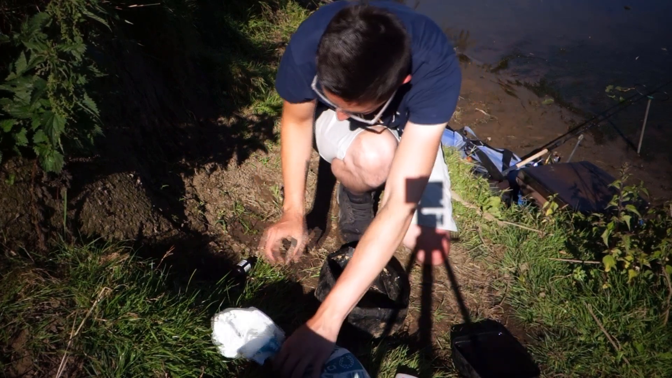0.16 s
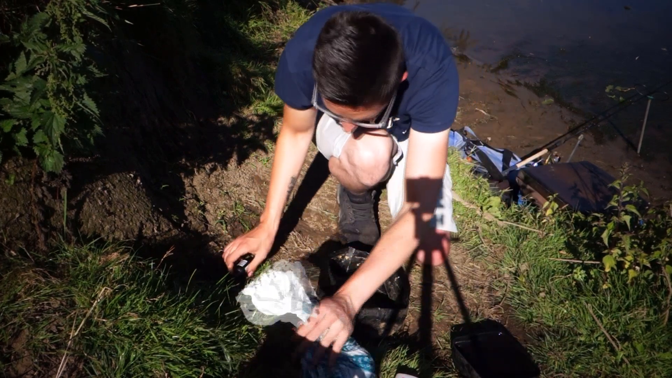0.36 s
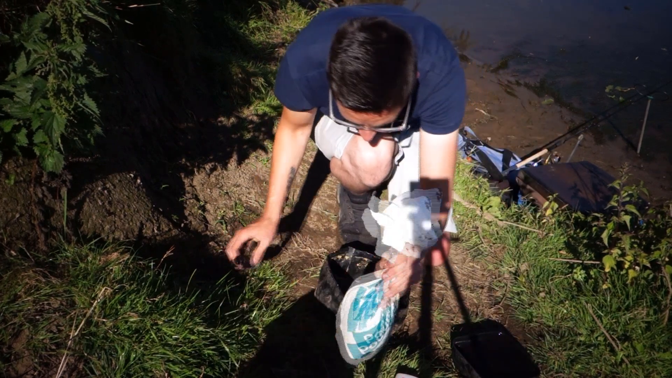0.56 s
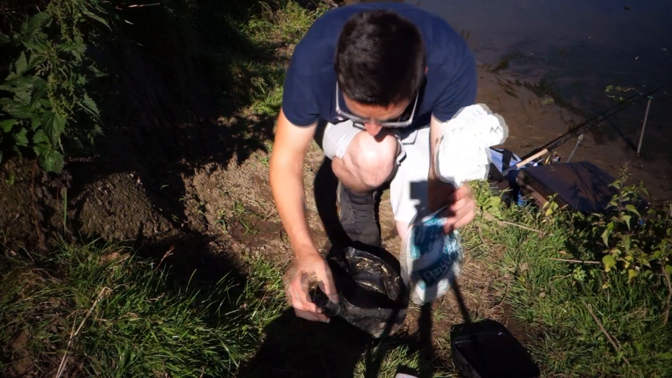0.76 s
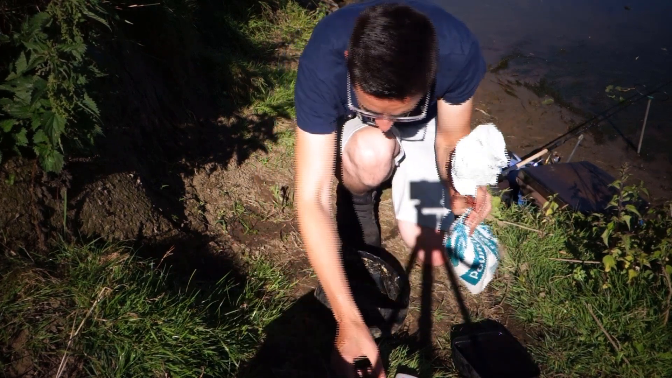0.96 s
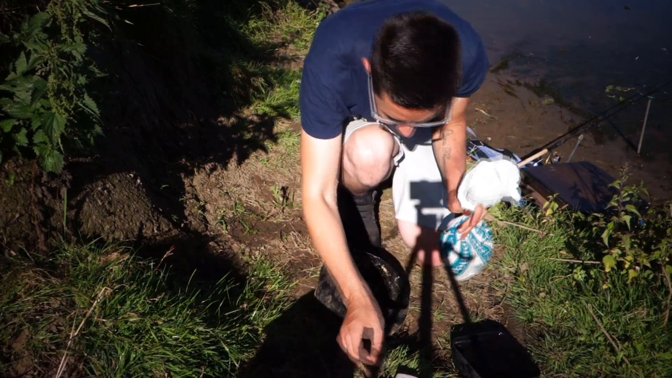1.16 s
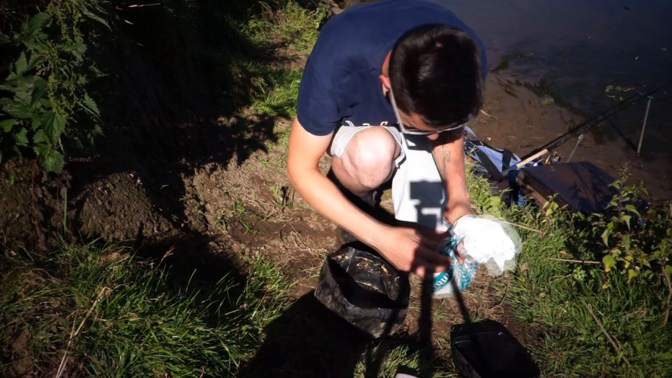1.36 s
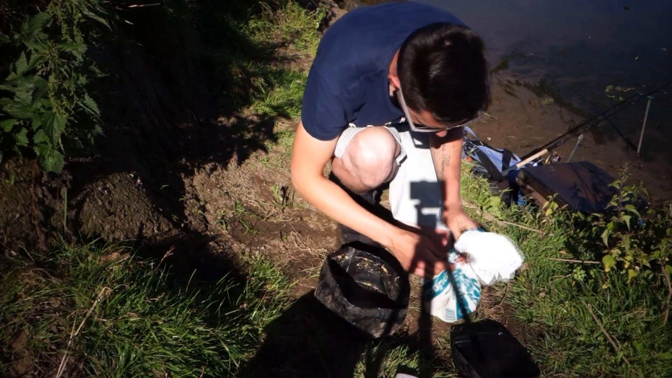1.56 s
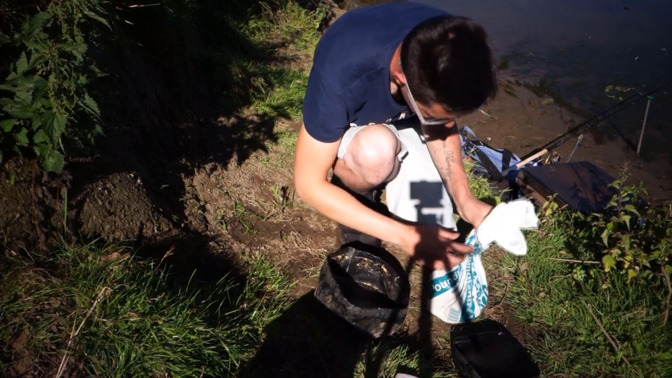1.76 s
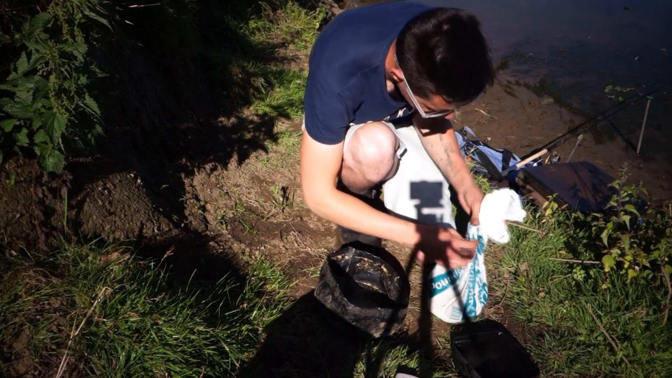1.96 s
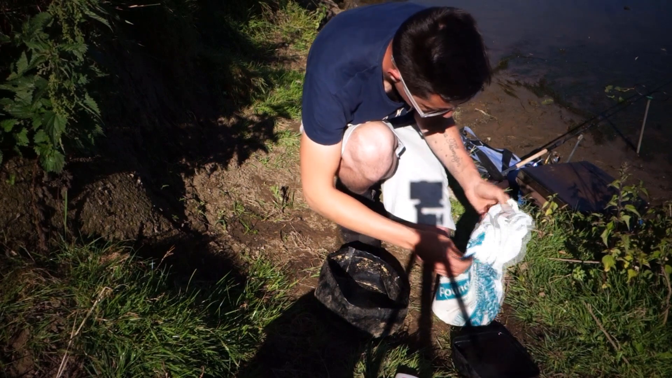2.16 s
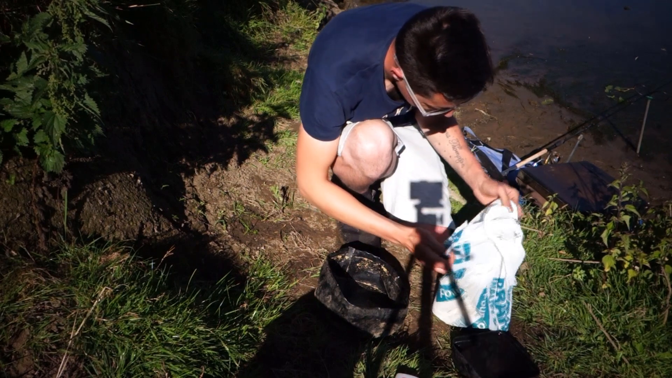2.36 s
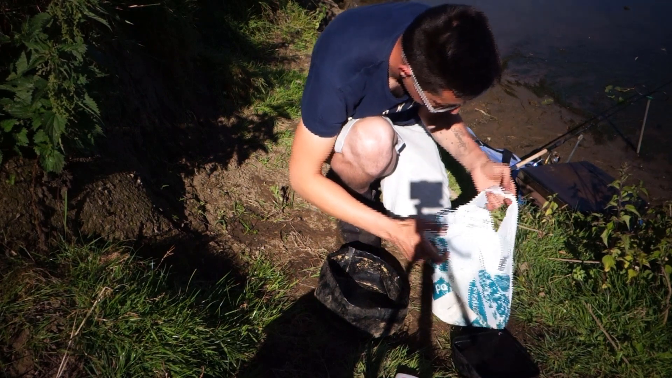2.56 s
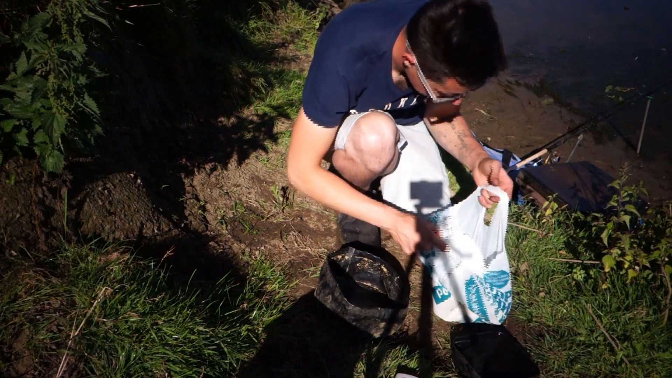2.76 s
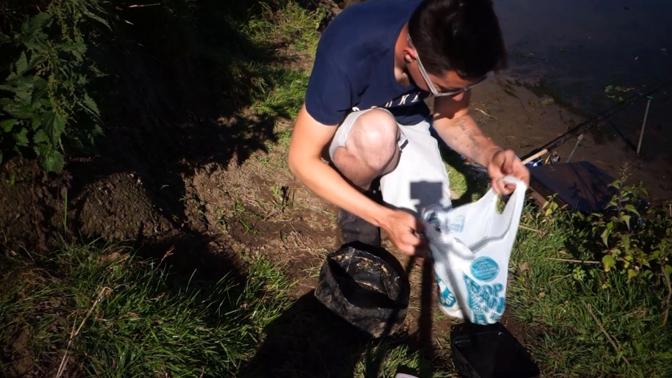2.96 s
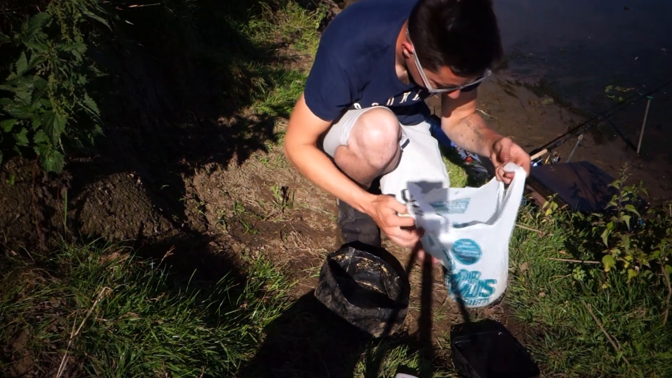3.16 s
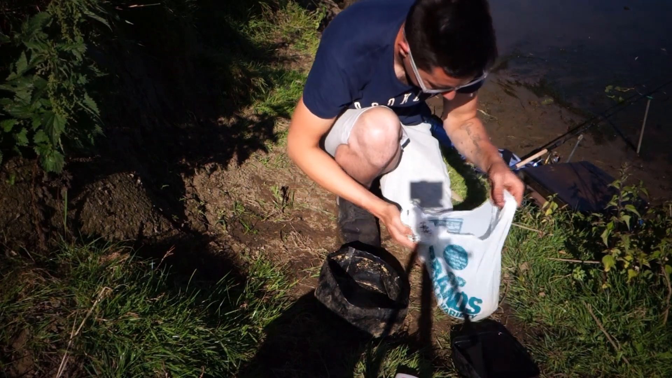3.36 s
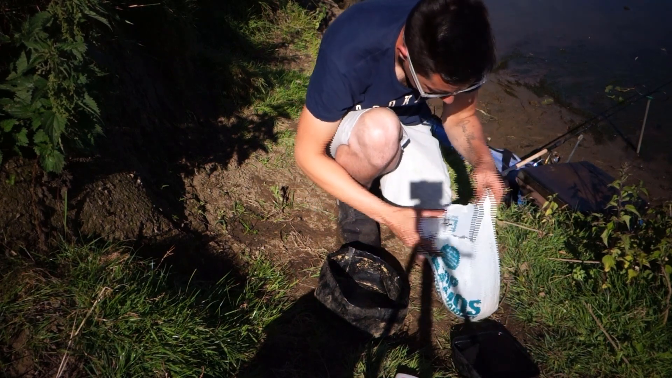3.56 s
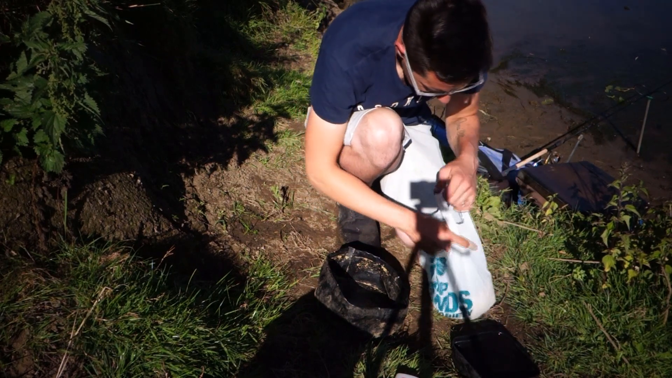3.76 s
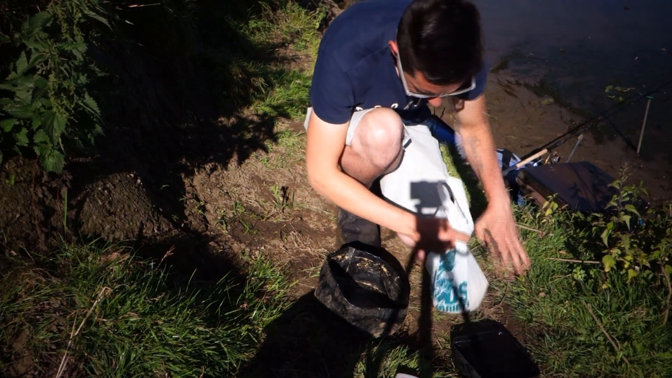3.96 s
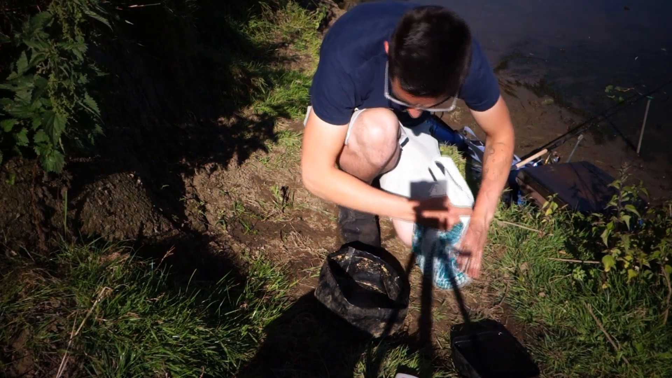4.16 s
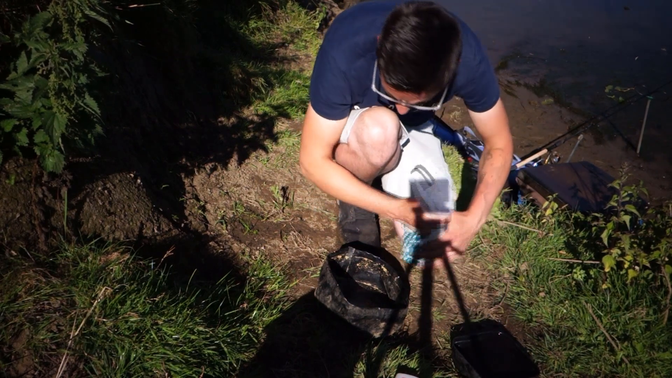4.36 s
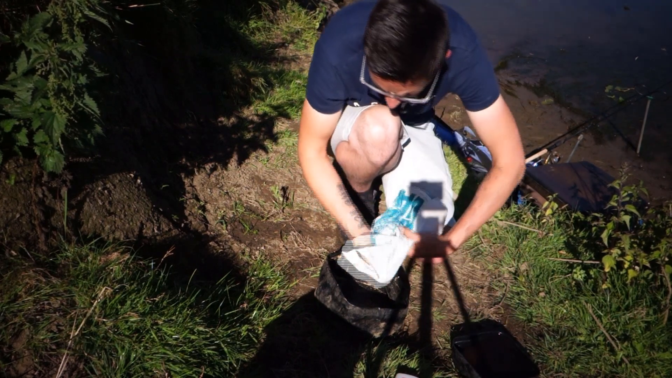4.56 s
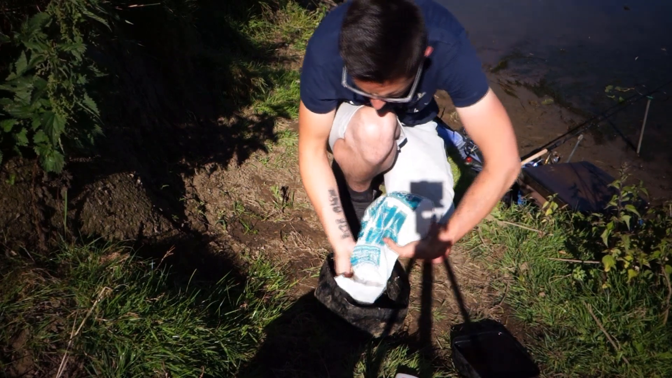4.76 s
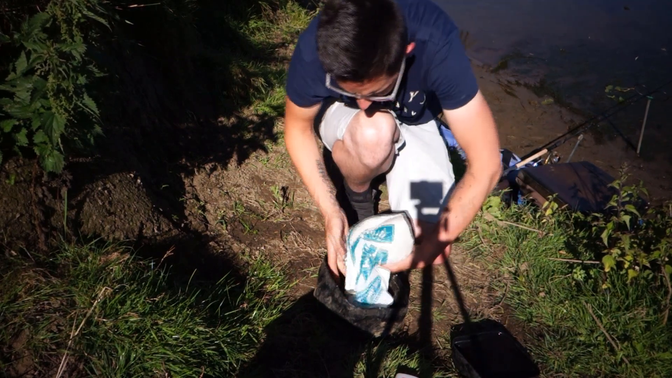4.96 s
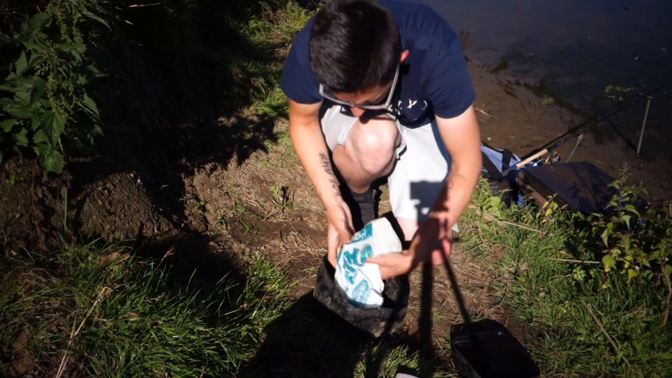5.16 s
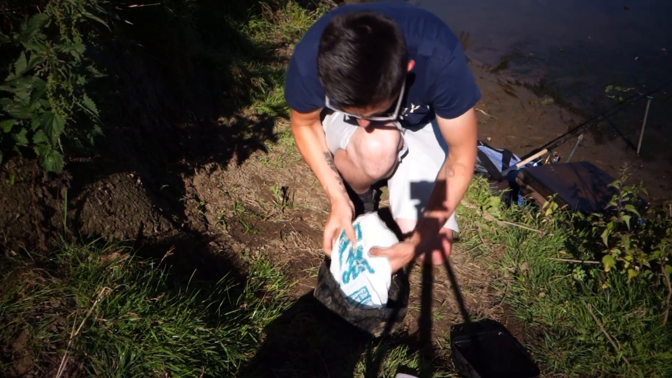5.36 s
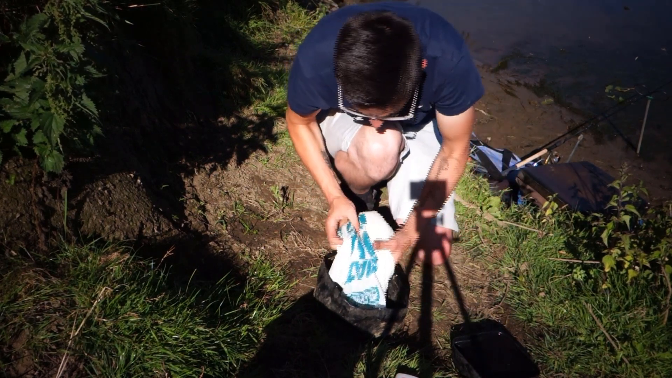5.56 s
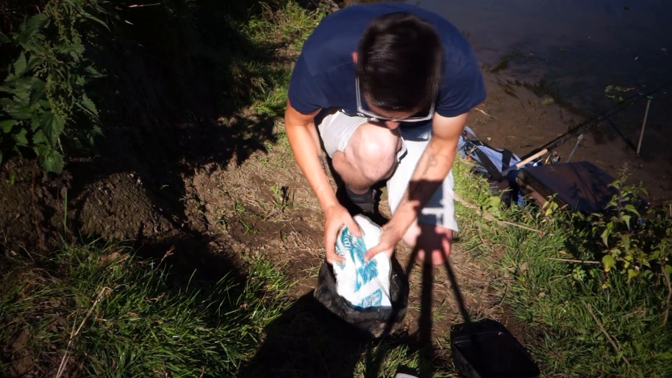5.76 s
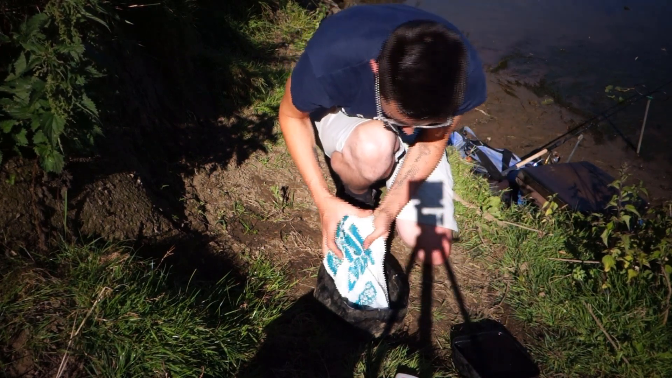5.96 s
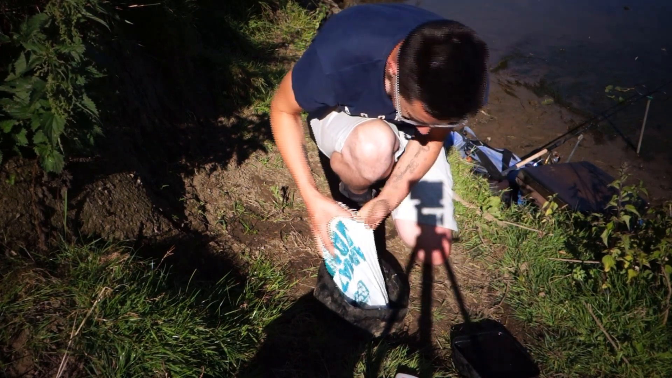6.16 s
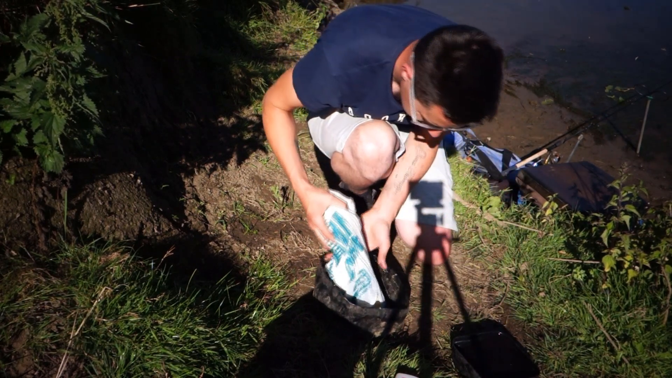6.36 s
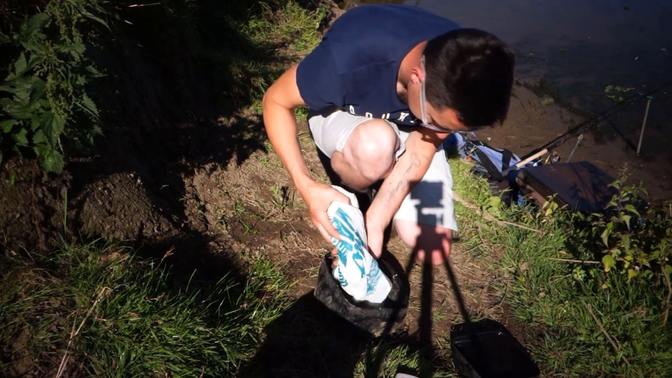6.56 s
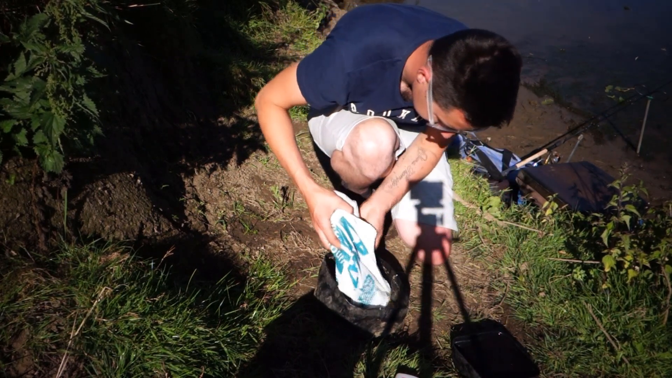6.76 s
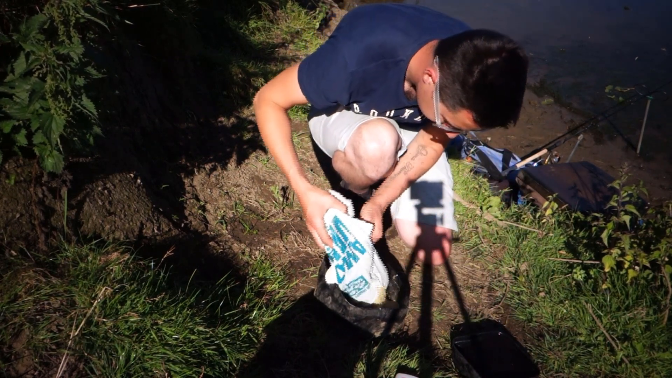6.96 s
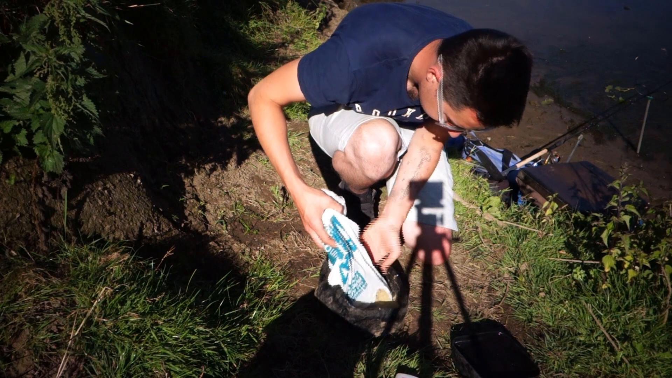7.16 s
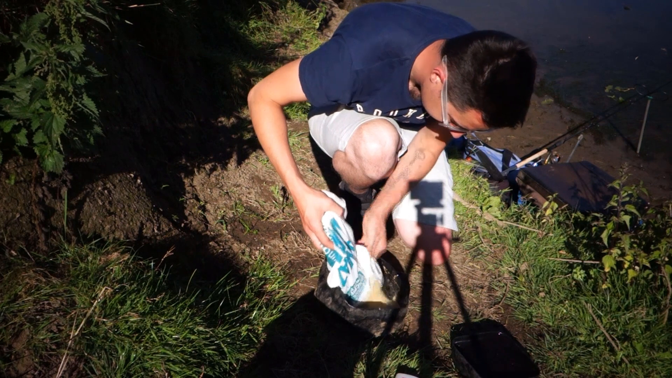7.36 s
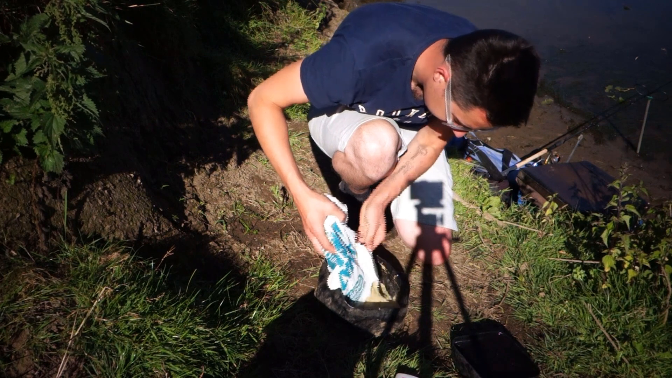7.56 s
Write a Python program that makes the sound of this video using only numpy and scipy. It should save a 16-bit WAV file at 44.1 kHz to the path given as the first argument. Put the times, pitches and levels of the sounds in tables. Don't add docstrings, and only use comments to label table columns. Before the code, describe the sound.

Open riverbank, close stereo microphone. For the first 0.25 s only distant tyre roar, a light low breeze and faint, quick bird chirps are heard. At about 0.3 s a thin plastic bag is grabbed, crackling brightly in swings to 0.8 s. Near 0.9 s it lands with a soft low thump and a small lid clinks in a rapid bounce around 0.93-0.95 s. Sharp lone creases pop until 1.35 s; a tub is tapped at 1.27 s with a short hollow ring and a drop of crumbs. From 1.6 s rustling grows dense, loudest around 2.2-4.1 s, slightly right, with crumbs sliding dully near 2.6 and 3.7-4.1 s. It eases around 4.6 s, then shakes crackle in uneven bursts from 4.8 s to the end at 7.6 s, a snap at 5.4 s, a faint thump at 5.6 s, with soft hollow crumb slides especially after 6 s.

```python
import sys
import numpy as np
from scipy import signal
from scipy.fft import rfft, irfft, next_fast_len
from scipy.io import wavfile
from scipy.ndimage import uniform_filter1d, map_coordinates

SR = 44100
rng = np.random.default_rng(int(sys.argv[2]) if len(sys.argv) > 2 else 0)


def dump_mix(stems):
    frames = np.atleast_2d(stems).T
    limited = np.clip(frames, -1, 1)
    pcm = np.round(limited * 32767).astype(np.int16)
    wavfile.write(sys.argv[1], SR, pcm)


def invert_db(x):
    u = np.asarray(x, float) / 20
    return 10 ** u


N = 336042


def unit(x):
    return x / np.sqrt(np.mean(x ** 2) + 1e-20)


def along(points, hz):
    f_hz, value = np.transpose(points)
    return np.interp(np.log(hz + 1), np.log(f_hz + 1), value)


def curves(rows):
    t_s, *columns = np.transpose(rows)
    return [np.interp(np.arange(N) / SR, t_s, column) for column in columns]


def wobble(knots_per_s):
    knots = rng.standard_normal(int(N * knots_per_s / SR) + 4)
    return map_coordinates(knots, [np.arange(N) * knots_per_s / SR])


def filtered(x, response):
    m = next_fast_len(N + 8192)
    return irfft(rfft(x, m) * response(np.fft.rfftfreq(m, 1 / SR)), m)[..., :N]


def spread(pair, alike, colour):
    def mid_side_gain(hz):
        turn_rad = np.arccos(np.clip(along(alike, hz), -1, 1)) / 2
        return colour(hz) * np.array([np.cos(turn_rad), np.sin(turn_rad)])

    mid, side = filtered(pair, mid_side_gain)
    return unit(np.array([mid + side, mid - side]))


def patchy(x, depth_db):
    z = signal.stft(x, nperseg=512)[2]
    field = uniform_filter1d(rng.standard_normal(z.shape[1:]), size=7, axis=0)
    field = uniform_filter1d(field, size=12, axis=1)
    return signal.istft(z * invert_db(depth_db * unit(field)), nperseg=512)[1][:, :N]


def swells(steady, events):
    t = np.arange(0, N, 96) / SR
    peak_s, db, rise_s, fall_s = np.transpose(events)[:, :, None]
    swell_db = db - 10 * np.where(t < peak_s, (peak_s - t) / rise_s, (t - peak_s) / fall_s)
    power = np.sum(invert_db(2 * swell_db), axis=0) + invert_db(2 * np.interp(t, *np.transpose(steady)))
    return np.interp(np.arange(N) / SR, t, 10 * np.log10(power))


def grains(per_s, scatter_db, hiss):
    keep, when, size, sign = rng.random((60000, 4)).T
    kept = keep < per_s * 2 * N / SR / len(keep)
    size_db = scatter_db * np.minimum(-np.log(size + 1e-9), 4)
    blow = kept * invert_db(size_db) * (sign - .5)
    snaps = unit(np.bincount((when * 2 * N).astype(int), blow, 2 * N).reshape(2, N))
    hiss = np.clip(hiss, 0, 1)
    return np.sqrt(1 - hiss) * snaps + np.sqrt(hiss) * rng.standard_normal((2, N))


def add(out, s, hz, db, t60_s, rise_s):
    t = np.arange(SR // 2) / SR
    envelope = invert_db(db - 60 * t / t60_s) * (1 - np.exp(-t / rise_s))
    out[round(s * SR):][:len(t)] += envelope * np.sin(2 * np.pi * hz * t)


# f/Hz, level/dB per Hz
TRAFFIC = [(25, -52), (90, -37), (240, -22), (450, -16), (700, -10.5), (900, -4.5), (1100, -2), (1400, -11),
           (2000, -17.5), (2700, -20.5), (4200, -17.5), (6000, -24), (15500, -36)]
# t/s, level/dB
ROAD = [(0, -59.5), (1.2, -57.5), (2.5, -63), (4.5, -61), (7.62, -71.5)]
# f/Hz, likeness/1
ROAD_ALIKE = [(30, .1), (100, 0.46), (300, 0.78), (1000, 0.56), (3000, 0.2), (10000, 0.12)]


def traffic():
    level_db, = curves(ROAD)
    noise = patchy(rng.standard_normal((2, N)), depth_db=1.6)
    roar = spread(noise, ROAD_ALIKE, lambda hz: invert_db(along(TRAFFIC, hz)))
    return roar * invert_db(level_db + 0.27 * wobble(4.15))


# f/Hz, level/dB per Hz
BREEZE = [(20, -15), (60, 1), (110, 1), (200, -0.5), (350, -28)]


def breeze():
    level_db, lull_db, lulls_per_s = -85.5, 1.8, 9
    noise = rng.standard_normal((2, N))
    rumble = spread(noise, [(30, .1), (200, 0.7)], lambda hz: invert_db(along(BREEZE, hz)) * (hz < 400))
    return rumble * invert_db(level_db - lull_db * wobble(lulls_per_s) ** 2 + 1.5 * wobble(11))


# t/s, half length/s, f/Hz, glide/(Hz/s), level/dB
CHIRPS = [
    (.10, .03, 3100, 2500, -67),
    (.05, .04, 4150, -2000, -76),
    (.13, .025, 3850, -4000, -74),
    (.232, .007, 5100, 0, -69),
    (.22, .01, 3000, 0, -72),
    (.25, .03, 4150, 3000, -75),
]


def bird():
    t = np.arange(N) / SR
    out = np.zeros(N)
    for s, half_s, hz, glide, db in CHIRPS:
        dt = t - s
        out += invert_db(db) * np.exp(-(dt / half_s) ** 2) * np.sin(2 * np.pi * (hz + glide * dt / 2) * dt)
    return out


# t/s, level/dB
SETTLING = [(.3, -68), (1.2, -75), (2.2, -68), (4.7, -71), (5.3, -66), (7.62, -63)]
# peak t/s, level/dB, 10 dB rise/s, 10 dB fall/s
SLIDES = [(.64, -64, .3, .06), (.95, -65, .08, .25), (1.284, -48, .008, .03), (2.57, -59, .3, .6),
          (3.74, -50, .35, .3), (4.04, -48, .13, .26), (5.03, -56, .05, .15), (5.42, -59, .07, .4),
          (6.02, -54, .1, .17), (6.29, -53.5, .2, .12), (6.52, -55, .4, .06), (6.62, -51, .06, .1),
          (6.72, -53, .03, .05), (6.94, -54.5, .2, .13), (7.29, -56.5, .2, .07), (7.56, -54, .1, .08)]
# f/Hz, width/Hz, level/dB
HOLLOW = [
    (390, 150, -3),
    (543, 153, -2),
    (673, 140, 0),
]
# t/s, smallness/1 (0 large, 1 small)
OPENING = [(0, 0.73), (2, 0.19), (3.2, 0.22), (3.5, .5), (3.9, .5), (4.1, 0.49), (4.3, 0.81), (4.6, 0.28),
           (5.8, 0.72), (6.3, 0.63), (6.6, 0.77), (7.2, 0.48), (7.55, .9)]


def crumbs():
    level_db = swells(SETTLING, SLIDES)
    small, = curves(OPENING)
    slide = spread(grains(per_s=900, scatter_db=1.5, hiss=0.53), [(300, 0.94)],
                   lambda f: f ** 2 / (f ** 2 + 300 ** 2) * (f < 3000))
    hush = np.zeros((2, N))
    for k, (c, w, db) in enumerate(HOLLOW):
        weight = np.sqrt(np.clip(1 - abs(2 * np.clip(small, 0, 1) - k), 0, 1))
        ring = filtered(slide, lambda f: 1j * f * w / (c * c - f * f + 1j * f * w))
        hush += weight * invert_db(db) * unit(ring)
    return hush * invert_db(level_db - 2.5 + 0.5 * wobble(12)) * invert_db([[-.9], [.9]])


# t/s, level/dB
GRIP = [(0.27, -70), (1.55, -57), (2.1, -36), (3.6, -70), (4.6, -70), (5.2, -48), (7.62, -70)]
# peak t/s, level/dB, 10 dB rise/s, 10 dB fall/s
LIFTING = [(0.292, -50.0, 0.014, 0.025), (0.357, -48.5, 0.043, 0.066), (0.463, -42.0, 0.079, 0.051),
           (0.588, -43.0, 0.033, 0.17), (0.612, -39.0, 0.088, 0.011), (0.777, -47.0, 0.019, 0.051),
           (0.829, -52.0, 0.057, 0.008), (0.991, -45.0, 0.102, 0.111), (1.247, -50.0, 0.266, 0.234),
           (1.345, -45.5, 0.019, 0.033), (1.433, -45.0, 0.046, 0.13), (1.528, -45.5, 0.035, 0.084)]
# peak t/s, level/dB, 10 dB rise/s, 10 dB fall/s
UNFOLDING = [(1.644, -41.5, 0.021, 0.105), (1.778, -41.5, 0.099, 0.51), (2.111, -36.0, 0.015, 0.039),
             (2.252, -33.0, 0.076, 0.402), (2.431, -36.5, 0.005, 0.008), (2.495, -37.0, 0.038, 0.106),
             (2.566, -33.5, 0.034, 0.101), (2.615, -35.0, 0.005, 0.422), (2.726, -36.5, 0.007, 0.059),
             (2.957, -36.0, 0.043, 0.009), (3.145, -32.5, 0.197, 0.036), (3.29, -36.5, 0.315, 0.291),
             (3.418, -32.5, 0.011, 0.039), (3.505, -33.5, 0.032, 0.058), (3.695, -37.0, 0.287, 0.111),
             (3.758, -39.0, 0.017, 0.044), (3.96, -30.5, 0.009, 0.046), (3.979, -32.5, 0.154, 0.031),
             (4.048, -34.0, 0.054, 0.109), (4.261, -42.5, 0.015, 0.107), (4.386, -36.0, 0.144, 0.157),
             (4.647, -47.5, 0.041, 0.019)]
# peak t/s, level/dB, 10 dB rise/s, 10 dB fall/s
SHAKING = [(4.75, -43.5, 0.048, 0.468), (4.884, -39.5, 0.026, 0.43), (5.002, -38.0, 0.253, 0.434),
           (5.395, -35.5, 0.011, 0.192), (5.609, -36.0, 0.099, 0.043), (5.766, -37.0, 0.166, 0.059),
           (5.977, -34.0, 0.087, 0.095), (6.214, -36.0, 0.179, 0.121), (6.276, -38.5, 0.022, 0.027),
           (6.415, -34.0, 0.182, 0.176), (6.725, -39.0, 0.053, 0.092), (6.828, -40.0, 0.018, 0.016),
           (6.911, -35.0, 0.108, 0.131), (6.988, -37.0, 0.034, 0.09), (7.071, -36.5, 0.041, 0.245),
           (7.224, -43.5, 0.075, 0.458), (7.292, -36.0, 0.046, 0.014), (7.421, -37.0, 0.046, 0.008),
           (7.53, -34.5, 0.113, 0.084)]
# peak t/s, level/dB, 10 dB rise/s, 10 dB fall/s
SNAPS = [
    (.85, -47, .003, .005),
    (4.388, -40, .012, .015),
    (4.422, -41, .008, .01),
    (5.405, -35, .012, .025),
]
# t/s, small creases/dB, large creases/dB, left-right/dB
HOLD = [(.24, -.5, -7, 0), (.6, -.5, 2, -.7), (.8, -.5, 0, -3), (1.1, .5, 7, -4.5), (1.5, .8, -4, -4.3),
        (1.9, -.5, -3.5, -4), (2.3, -.5, -2, -3.5), (2.7, .8, .5, -4), (3.5, .3, .5, -2.8),
        (4.3, 0, -2.5, -3.8), (4.62, -.5, 6.5, -3.2), (4.95, .5, 0, -1.5), (5.35, 1, 3, -2),
        (5.85, 0, 2.5, -1.8), (6.3, 0, 0, -1.7), (6.7, 1.3, 2, -1.7), (7.62, .5, -.5, -2)]
# f/Hz, level/dB per Hz
FILM = [(60, -70), (200, -38), (330, -26), (500, -18.5), (800, -12), (1070, -8), (1390, -7.5), (2140, -3.5),
        (3000, -1.5), (7270, 0.5), (12400, 0), (14500, -4.5), (15800, -7.5)]
# f/Hz, likeness/1
FILM_ALIKE = [(300, 0.92), (1000, 0.85), (2400, .93), (5000, 0.8), (9000, 0.84), (15000, 0.79)]
# f/Hz, phase/rad
LEAD_CENTRE = [(1500, 0), (5080, .12), (7750, -.3), (10100, -.12), (15100, -.5)]
# f/Hz, phase/rad
LEAD_ASIDE = [(1500, 0), (5500, -.35), (7750, -1.15), (11300, -1.1), (14200, -1.8), (15900, -2)]


def bag():
    effort_db = swells(GRIP, LIFTING + UNFOLDING + SHAKING + SNAPS)
    small_db, large_db, pan_db = curves(HOLD)
    effort_db = uniform_filter1d(effort_db, size=SR // 300)
    large_db -= 0.26 * (effort_db - uniform_filter1d(effort_db, size=SR // 5))

    bands_log2_hz = np.log2(np.geomspace(1200, 13000, num=5))
    film = np.zeros((2, N))
    for k, tilt_db in enumerate([large_db, large_db / 2, 0, small_db / 2, small_db]):
        share = lambda hz: np.sqrt(np.interp(np.log2(hz + 1), bands_log2_hz, np.arange(5) == k))
        creases = grains(per_s=3900, scatter_db=2.4, hiss=.67)
        film += filtered(creases, share) * invert_db(tilt_db)
    film = spread(patchy(film, depth_db=1.02), FILM_ALIKE, lambda hz: invert_db(along(FILM, hz)))

    lead_rad = lambda hz: np.array([along(LEAD_CENTRE, hz), along(LEAD_ASIDE, hz)])
    centre, aside = filtered(film[0], lambda hz: np.exp(1j * lead_rad(hz)))
    shift = np.clip((-pan_db - 2.5) / 0.82, 0, 1)
    film[0] = (1 - shift) * centre + shift * aside

    grab_s, fade_s = .268, .012
    lifted = np.clip((np.arange(N) / SR - grab_s) / fade_s, 0, 1)
    clump_db = 0.24 * wobble(30) + 0.65 * wobble(90)
    return film * lifted * invert_db(effort_db + 2.6 + clump_db + np.outer([.5, -.5], pan_db))


# t/s, peak level/dB, f/Hz
TICKS = [(0.7774, -36, 6060), (0.8054, -34, 6740), (0.8324, -39, 11200), (0.8504, -35, 7740),
         (0.9714, -30, 7410), (1.0054, -35, 5250), (1.0444, -34, 11000), (1.0924, -38, 6400),
         (1.0994, -40, 6860), (1.1832, -35, 12000), (1.2374, -37, 10400), (1.2884, -35, 10500),
         (1.3443, -30, 5030)]


def pops():
    out = np.zeros(N + SR)
    for s, db, hz in TICKS:
        add(out, s, hz, db + 1, t60_s=.0025, rise_s=.00005)
    return out[:N]


# t/s, f/Hz, peak level/dB, t60/s
THUMPS = [
    (.90, 151, -62, 0.064),
    (5.62, 140, -65, 0.089),
]


def landings():
    out = np.zeros(N + SR)
    for s, hz, db, t60_s in THUMPS:
        add(out, s, hz, db, t60_s, rise_s=0.0037)
    return out[:N]


# t/s, f/Hz, peak level/dB, t60/s
CLINKS = [(.921, 3200, -39, .02), (.926, 3120, -39, 0.022), (.9305, 3430, -38, .012),
          (.9315, 4270, -30.5, .018), (.9318, 5500, -34, .016), (.934, 4900, -37, .012),
          (.9368, 3140, -29.5, 0.019), (.9468, 5300, -28, .016), (.9468, 6940, -28, .014),
          (.9468, 6000, -23, .01), (.9488, 5920, -25, .012), (.9488, 6350, -29, .012),
          (.949, 8600, -35, .015), (.949, 3300, -37, .02), (.957, 3300, -44, .02)]


def lid():
    out = np.zeros(N + SR)
    for s, hz, db, t60_s in CLINKS:
        add(out, s, hz, db, t60_s, rise_s=0.00032)
    return out[:N]


# f/Hz, peak level/dB, t60/s, build-up/s
TUB = [(195, -51.5, 0.23, 0.017), (284, -44, 0.26, 0.02), (406, -46, 0.066, .008), (511, -34, 0.076, .003),
       (554, -39, .05, .003), (725, -46, .035, .003), (1200, -37, 0.032, 0.0017), (2020, -30, 0.02, 0.0016),
       (2380, -30, 0.02, .003), (2670, -20.5, 0.014, 0.0027), (3600, -35, .02, .001),
       (4700, -30, .015, .001), (5360, -37, .012, .001), (7700, -35, .015, .001)]


def tub():
    tap_s = 1.2702
    out = np.zeros(N + SR)
    for hz, db, t60_s, rise_s in TUB:
        add(out, tap_s, hz, db, t60_s, rise_s)
    t = np.arange(SR // 20) / SR
    crack = np.convolve(rng.standard_normal(len(t)), [1, 2, 1, -1, -2, -1], 'same')
    out[round(tap_s * SR):][:len(t)] += invert_db(-47 - 60 * t / 0.026) * crack
    return out[:N]


def scene():
    background = traffic() + breeze() + bird()
    handling = crumbs() + bag()
    knocks = pops() + landings() + lid() + tub()
    return background + handling + knocks * invert_db([[-.6], [.6]])


def band_limit(x):
    return signal.sosfilt(signal.butter(12, 16390, fs=SR, output="sos"), x)


def record(dry):
    mix = filtered(dry, lambda hz: hz < 15810)
    return band_limit(mix)


dry = scene()
out = record(dry)
dump_mix(out)
```